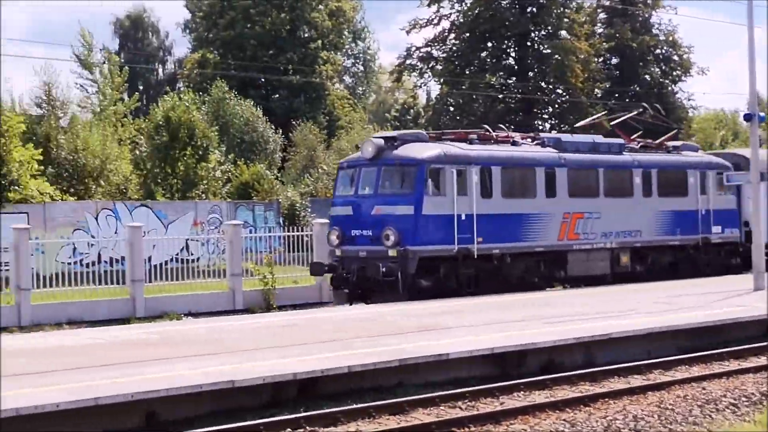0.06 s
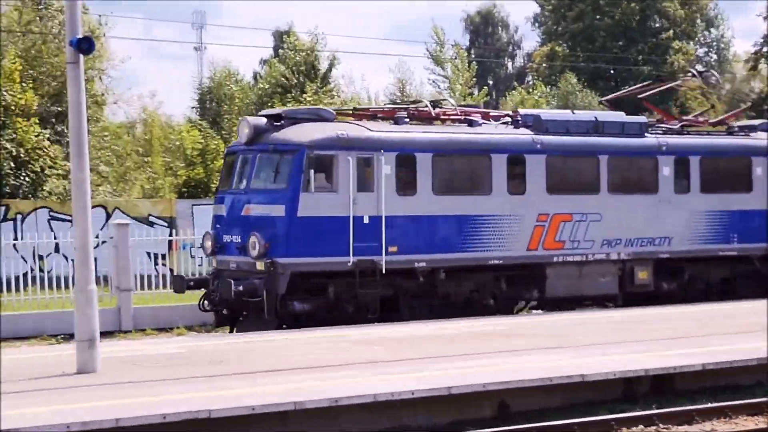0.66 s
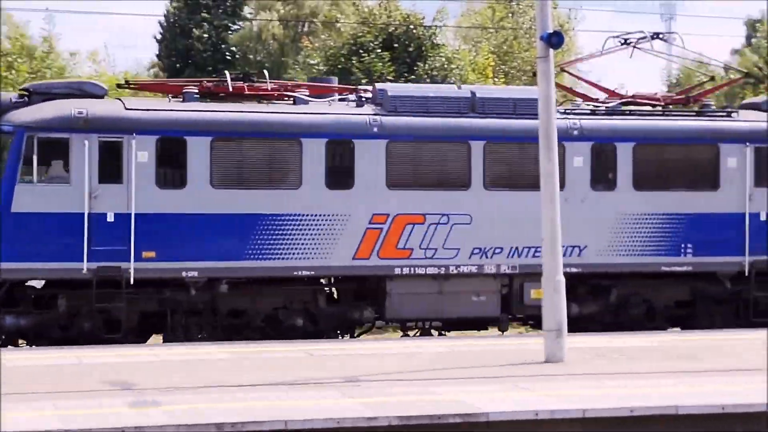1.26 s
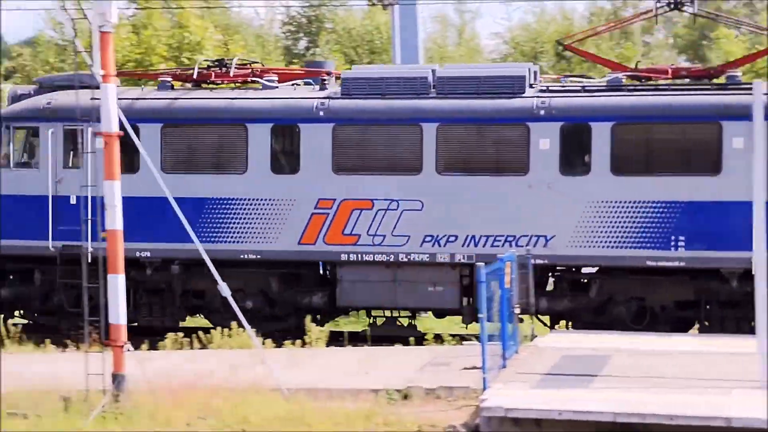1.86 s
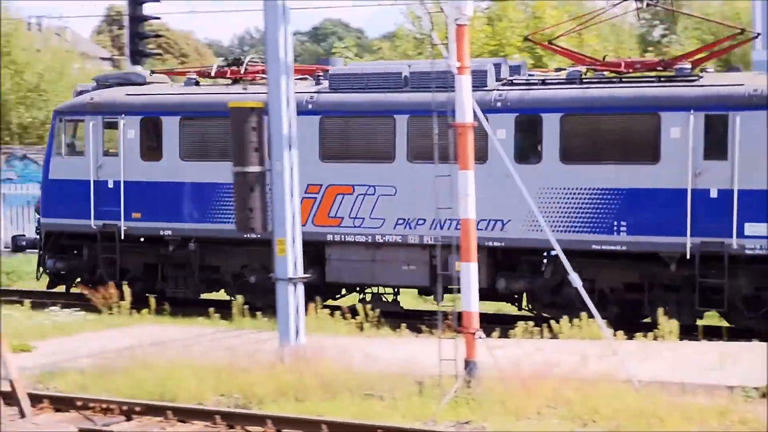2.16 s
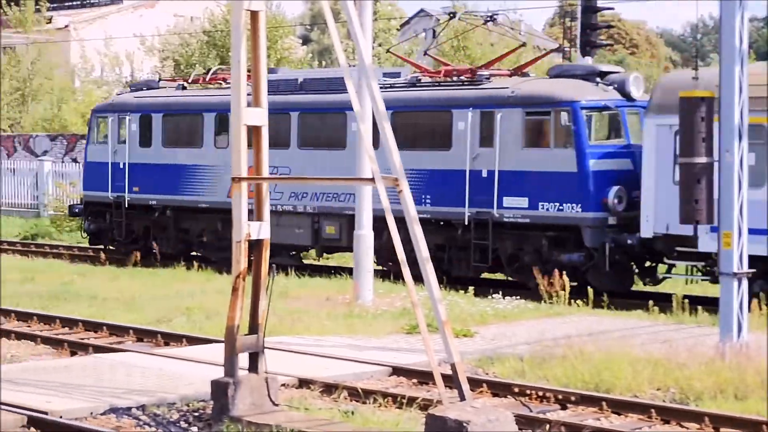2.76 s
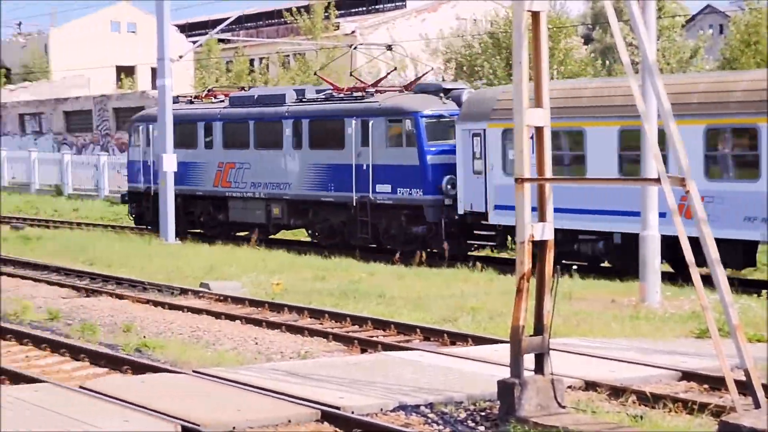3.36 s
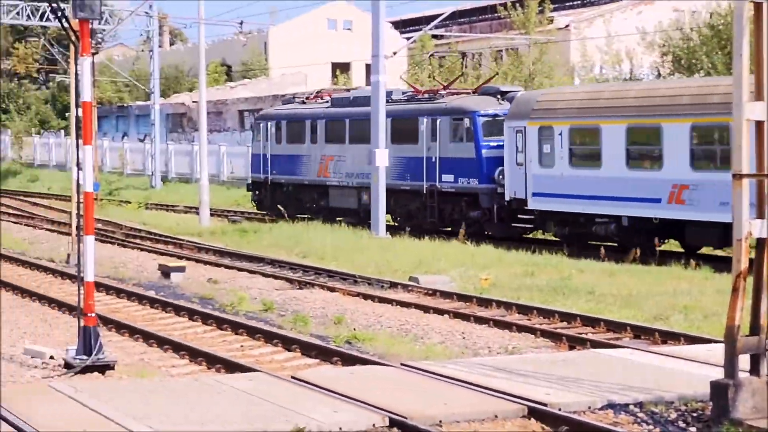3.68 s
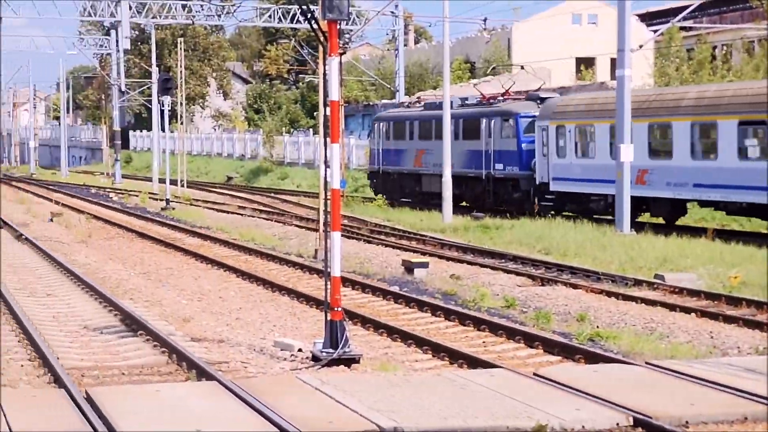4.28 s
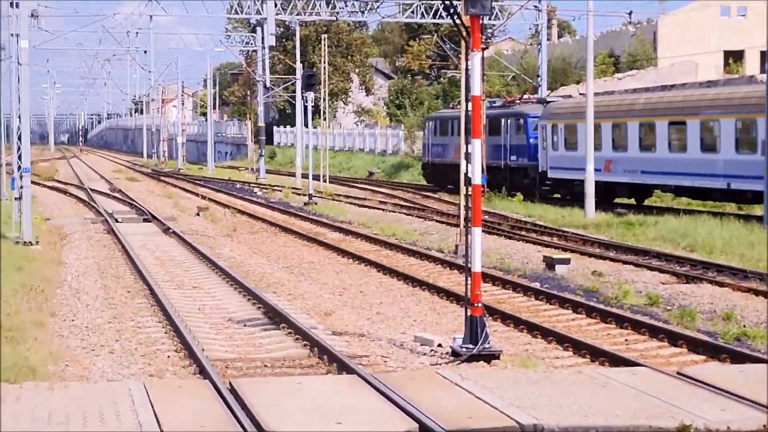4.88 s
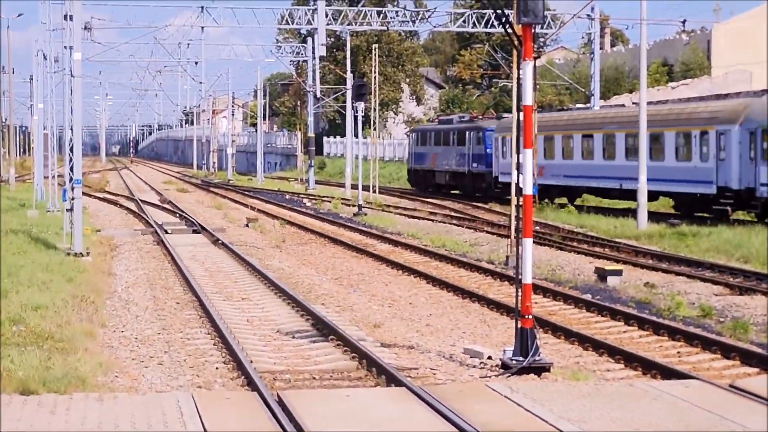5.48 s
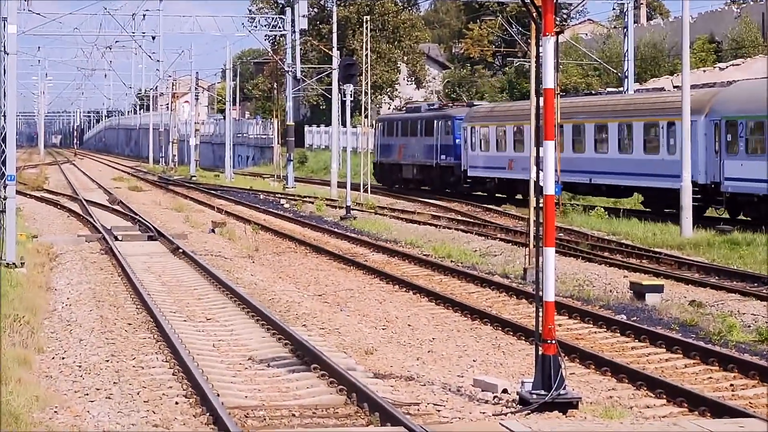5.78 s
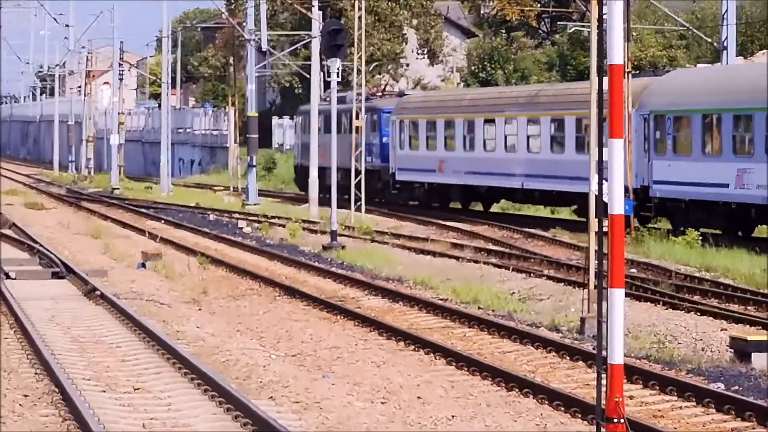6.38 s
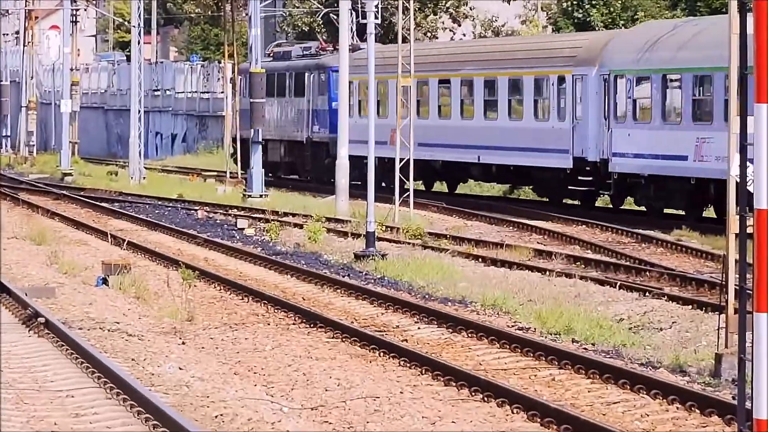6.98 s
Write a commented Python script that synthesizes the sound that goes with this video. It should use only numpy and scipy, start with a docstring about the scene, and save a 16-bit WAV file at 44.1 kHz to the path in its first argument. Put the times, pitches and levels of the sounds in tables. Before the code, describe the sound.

An electric train passes close to a station platform, heard in stereo with faint, low gusts on the microphone. From the start the rails carry a roar ahead of it, and single wheels sing out in brief metallic tones that recur throughout. At about 0.8 seconds comes a short, high hiss, with soft thumps there and near 1.3 seconds. The locomotive's bright, rough rush of steel wheels peaks around 1.6 seconds over a low rumble. The coaches follow from roughly 2.5 seconds with a duller rush, more ringing and a strong rail roar, swelling near 3, 3.8 and 5 seconds. The wheel noise sinks in pitch as they go by. Wheels knock and clank near 1.8 and 2.5 seconds, several times between 3.5 and 4.1, and again around 6 and 6.5. A faint low drone accompanies the last coaches, and the rolling eases, still audible at 7 seconds.

```python
"""An electric train runs through a station, heard in stereo from the platform, close to the track.
Light air brushes the microphone, single wheels sing out, and the rails carry a roar ahead of the train.
The locomotive spits a short hiss and passes in a bright rush of rough steel rolling on steel.
Its coaches follow over roaring rails: a few wheels knock, the bodies rumble, and the wheels' ringing
sinks in pitch as they go by. A low drone hangs about the last coaches."""
import sys
import numpy as np
from scipy import signal
from scipy.fft import rfft, irfft, next_fast_len
from scipy.io import wavfile
from scipy.ndimage import uniform_filter1d, map_coordinates

SR = 44100
rng = np.random.default_rng(int(sys.argv[2]) if len(sys.argv) > 2 else 0)


def waveform_to_disk(signal):
    """Save audio, clipped to [-1, 1], as 16-bit WAV at the path in sys.argv[1]."""
    frames = np.transpose(np.atleast_2d(signal))
    scaled = np.clip(frames, -1, 1) * 32767
    samples = np.round(scaled).astype(np.int16)
    wavfile.write(sys.argv[1], SR, samples)


N = 314874
TIME = np.arange(N) / SR
FREQ = np.maximum(np.fft.rfftfreq(next_fast_len(int(1.1 * N)), 1 / SR), 1)

# A coach wheel's resonances at rest. Each row: pitch in Hz, width in Hz, relative level in dB.
COACH_MODES = [(1495, 130, 0), (2085, 100, 0.3), (2672, 75, -0.3), (2825, 115, 2), (3080, 100, -1.5),
               (3445, 80, -1), (3740, 90, -1), (4220, 90, -4.5), (4820, 220, -6.5), (5720, 260, -14)]
# The spectrum of the rails. Each row: frequency in Hz, relative level in dB.
RAIL_SPECTRUM = [(250, -59), (340, -20), (400, -4.5), (480, 0), (700, 1), (900, 3), (1100, 2.5),
                 (1270, -3.5), (1420, 1.5), (1700, -4.5), (2300, -8), (4500, -25)]


def undb(db):
    """Decibels to gain."""
    return 10 ** (np.asarray(db) / 20)


def colour(points):
    """Gain per frequency through (Hz, dB) points, silent above the last."""
    hz, db = np.transpose(points)
    return undb(np.interp(np.log(FREQ), np.log(hz), db, right=-np.inf))


def resonance(hz, width_hz):
    """Gain per frequency of one steep-sided resonance."""
    detune = (FREQ - hz ** 2 / FREQ) / (1.55 * width_hz)
    return 1 / (1 + detune ** 2)


def wheel_response(modes):
    """Gain per frequency of a wheel's resonances together."""
    return np.sqrt(sum((undb(db) * resonance(hz, width)) ** 2 for hz, width, db in modes))


def noise(gain):
    """Two unrelated noises (for mid and side) of one colour, rms 1, a little longer than the scene."""
    shape = (2, len(FREQ))
    x = irfft(gain * (rng.standard_normal(shape) + 1j * rng.standard_normal(shape)))
    return x / x.std()


def walk(rate, size=N):
    """Random levels held 1 / rate seconds and smoothed twice; spread near 1."""
    hold = max(int(SR / rate), 1)
    held = rng.standard_normal(1024)[np.arange(size) // hold % 1024]
    return 1.3 * uniform_filter1d(uniform_filter1d(held, hold), hold)


def passing(nearest_s, db, near_s):
    """Gain of sources that swell and fade with distance from the microphone; their powers add."""
    falloff_db = 30.5  # per tenfold distance: wheels radiate mostly sideways
    distance = np.hypot(1, (TIME - np.atleast_1d(nearest_s)[:, None]) / near_s)
    level_db = np.atleast_1d(db)[:, None] - falloff_db * np.log10(distance)
    return np.linalg.norm(undb(level_db), axis=0)


def doppler_glide(mach=.104, steepest_s=2.23, half_s=2.34):
    """Pitch ratio at the platform: high on the approach, low on the way out."""
    along = TIME - steepest_s
    return 1 / (1 + mach * along / np.hypot(along, half_s))


def moving(x, doppler):
    """Play a sound faster while it approaches and slower as it leaves."""
    place = np.cumsum(doppler)
    return np.array([map_coordinates(row, [place], order=3, mode="wrap") for row in x])


def puff(s, half_s, hz, width_hz, db):
    """A short smooth swell of noise in one band."""
    return noise(resonance(hz, width_hz))[:, :N] * undb(db) * np.exp(-((TIME - s) / half_s) ** 2)


def breeze(start_db=-60, fade_db_per_s=.6, gust_db=2.8):
    """Light air brushes the microphone in low gusts that slowly fade."""
    # Each row: frequency in Hz, relative level in dB.
    spectrum = [(15, -3), (28, -5), (45, 0.5), (68, 4), (100, -14), (200, -15), (600, -39)]
    return noise(colour(spectrum))[:, :N] * undb(start_db - fade_db_per_s * TIME + gust_db * walk(13))


def mode_swells(doppler, swells):
    """A wheel mode, shaken at random, swells and glides down with the pass, once for each row."""
    out = np.zeros(N)
    for s, half_s, hz, width_hz, db in swells:
        near = np.abs(TIME - s) < 3 * half_s
        t = TIME[near]
        phase = 2 * np.pi * np.cumsum(hz * doppler[near] / doppler[int(s * SR)]) / SR
        # the mode forgets its size and phase at a rate set by its width
        ring = walk(2 * width_hz, len(t)) * np.cos(phase) + walk(2 * width_hz, len(t)) * np.sin(phase)
        out[near] += ring * undb(db) * np.exp(-((t - s) / half_s) ** 2) / np.sqrt(2)
    return out


def singing_wheels(doppler):
    """Single wheels sing out above the rush, alike in both channels."""
    # Each row: middle and half length in seconds, pitch at the platform and width in Hz, level in dB.
    swells = [ (.26, .09, 4340, 28, -30.5), (.28, .04, 3100, 400, -27.5), (.2, .25, 2990, 70, -33),
              (.75, .16, 2800, 330, -29.5), (1.21, .17, 620, 60, -28.5), (1.55, .09, 2900, 220, -26),
              (2.21, .07, 602, 40, -28), (2.55, .13, 950, 200, -30), (2.7, .35, 2780, 70, -29.5),
              (2.9, .15, 1445, 45, -25.5), (3.0, .3, 2035, 55, -28.5), (3.47, .1, 2580, 55, -27),
              (3.62, .06, 2435, 40, -29), (3.75, .3, 1395, 45, -27), (3.85, .25, 4590, 120, -36.5),
              (4.4, .13, 2455, 60, -30), (4.52, .08, 1841, 40, -31), (4.83, .06, 2435, 40, -31),
              (5.2, .13, 1365, 90, -29), (5.95, .2, 2950, 420, -30), (6.22, .12, 4570, 100, -39),
              (6.15, .65, 2630, 190, -31.5), (6.44, .09, 2620, 130, -28), (6.5, .13, 1915, 55, -33.5),
              (6.85, .08, 2971, 25, -35), (7.0, .2, 2565, 85, -28.5)]
    return mode_swells(doppler, swells)


def roar_ahead():
    """The rails carry a roar to the platform ahead of the locomotive."""
    # Each row: frequency in Hz, relative level in dB.
    spectrum = [(290, -31.5), (390, -1), (480, -2), (700, -6), (1100, -1.5), (1290, -9), (2100, -9),
                (2550, 1), (3100, -12), (4500, -30)]
    return noise(colour(spectrum))[:, :N] * passing(nearest_s=1, db=-28, near_s=.8)


def spit():
    """A short, high hiss comes from the approaching locomotive."""
    return puff(s=.825, half_s=.068, hz=9900, width_hz=2900, db=-46.5)


def thumps():
    """Soft thumps and surges rise out of the rolling."""
    # Each row: middle and half length in seconds, band centre and width in Hz, level in dB.
    surges = [ (.835, .016, 230, 110, -38), (1.265, .016, 230, 110, -39), (3.87, .09, 740, 300, -29),
              (5.342, .02, 112, 65, -45), (5.39, .03, 780, 300, -30), (5.995, .022, 215, 110, -43.5),
              (6.22, .025, 720, 200, -31), (6.6, .4, 520, 160, -39)]
    return sum(puff(*surge) for surge in surges)


def rolling(gain, doppler, patchy_db=.5, patches_per_s=35):
    """Surface roughness shakes the moving wheels; rough patches come and go."""
    return moving(noise(gain), doppler) * undb(patchy_db * walk(patches_per_s))


def locomotive(doppler, nearest_s, rush_db, ring_db, near_s=1.18):
    """The locomotive's wheels roll by: a bright rush with a few resonances in it."""
    # The rush at rest. Each row: frequency in Hz, relative level in dB.
    spectrum = [(300, -39), (1200, -12), (1600, -2), (2200, 0), (2700, 1), (3350, 0), (4100, 0), (4500, -8),
                (5100, -12.5), (6200, -18.5), (7500, -25.5), (9500, -35), (12000, -48), (14000, -55.5)]
    # The wheel's resonances at rest. Each row: pitch in Hz, width in Hz, relative level in dB.
    modes = [(525, 103, -5.5), (1477, 71, -0.5), (2810, 76, 5), (3000, 60, -10), (4150, 160, -3.5)]
    rush = rolling(colour(spectrum), doppler) * passing(nearest_s, rush_db, near_s)
    ring = rolling(wheel_response(modes), doppler, patchy_db=-.7)
    return rush + ring * passing(nearest_s, ring_db, near_s)


def throb(turn_hz=6.9):
    """Swing of out-of-round wheels, which press on the track once a turn."""
    turns = np.cumsum(turn_hz * (1 + .089 * walk(2.4))) / SR
    return np.sin(2 * np.pi * turns)


def bodies(nearest_s, db, throb_db=1.1, patchy_db=1.5):
    """The bodies rumble in uneven surges, shaken by their wheels."""
    # Each row: frequency in Hz, relative level in dB.
    spectrum = [(60, -15.5), (95, -9.5), (125, -14), (160, 0.5), (210, 0.5), (268, 5.5), (320, 1),
                (400, 3.5), (700, -24.5)]
    rumble = noise(colour(spectrum))[:, :N] * undb(throb_db * throb() + patchy_db * walk(29))
    return rumble * passing(nearest_s, db, near_s=1.17)


def rails(nearest_s, db, throb_db=.4, patchy_db=.4):
    """The rails stay put, so their roar keeps its pitch; it throbs with the wheels and carries far."""
    roar = noise(colour(RAIL_SPECTRUM))[:, :N] * undb(throb_db * throb() + patchy_db * walk(25.28))
    return roar * passing(nearest_s, db, near_s=1.354)


def knocks(doppler, attack_s=.002, decay_s=.02):
    """A wheel strikes a flaw in the track: it clanks, the rail knocks, and both die away at once."""
    # Each row: start in seconds, wheel clank in dB, rail knock in dB.
    strikes = [(1.828, -28, -22), (2.422, -18, -28), (2.618, -26, -17), (3.566, -18, -19),
               (3.825, -27, -22), (3.91, -30, -22), (4.07, -30, -19), (5.908, -22, -27), (5.985, -28, -24),
               (6.458, -21, -31)]
    clank = moving(noise(wheel_response(COACH_MODES)), doppler)
    knock = noise(colour(RAIL_SPECTRUM))[:, :N]
    out = np.zeros((2, N))
    for s, clank_db, knock_db in strikes:
        age = np.maximum(TIME - s, 0)
        blow = np.minimum(age / attack_s, 1) * np.exp(-age / decay_s)
        out += blow * (undb(clank_db) * clank + undb(knock_db) * knock)
    return out


def coach_ringing(doppler, waver_share=.006, wavers_per_s=7):
    """Each resonance of the coach wheels swells and wavers in pitch on its own."""
    sizes = np.array([undb(db) * np.sqrt(width) for _, width, db in COACH_MODES])
    out = np.zeros((2, N))
    for (hz, width, _), size in zip(COACH_MODES, sizes / np.linalg.norm(sizes)):
        wavering = doppler * (1 + waver_share * walk(wavers_per_s))
        out += size * rolling(resonance(hz, width), wavering, patchy_db=2.05)
    return out


def flares(doppler, per_s=16, half_s=.055, width_hz=25, relative_db=-9):
    """At random, one resonance of one coach wheel flares up; no two wheels are tuned quite alike."""
    swells = []
    for when, which, detune in rng.random((int(per_s * N / SR), 3)):
        hz, _, db = COACH_MODES[int(which * len(COACH_MODES))]
        heard_hz = hz * doppler[int(when * N)] * (1 + .06 * (detune - .5))
        swells.append((when * N / SR, half_s, heard_hz, width_hz, relative_db + db))
    return mode_swells(doppler, swells)


def coaches(doppler, nearest_s, rush_db, ring_db, near_s=1):
    """The coaches' wheels roll by: a duller rush and more ringing."""
    # The rush at rest. Each row: frequency in Hz, relative level in dB.
    spectrum = [(300, -34.5), (1200, -26), (1700, -3), (2400, -3), (3000, -1), (3900, -2.5), (4350, -2.5),
                (4650, -6.5), (5500, -11.5), (6600, -21), (8300, -30), (10500, -41.5), (12000, -55.5),
                (14500, -67)]
    rush = rolling(colour(spectrum), doppler) * passing(nearest_s, rush_db, near_s)
    ring = coach_ringing(doppler)
    ring[0] += flares(doppler)  # in the mid only
    return rush + ring * passing(nearest_s, ring_db, near_s)


def drone(patchy_db=2):
    """A low, uneven drone hangs about the last coaches."""
    # Each row: frequency in Hz, relative level in dB.
    spectrum = [(60, -18), (90, 2), (115, -3.5), (150, 0.5), (260, -3.5), (420, -24)]
    hum = noise(colour(spectrum))[:, :N] * undb(patchy_db * walk(9))
    return hum * passing(nearest_s=5.7, db=-57.5, near_s=1.4)


def spread(sound, change_s=(4.1, 2.5)):
    """The channels part slightly; the top treble is wider in the later part."""
    # Stereo width. Each row: frequency in Hz, side against mid in dB early on, then later.
    width = [(60, -15, -15), (120, -15, -13), (200, -19.5, -18), (460, -25.5, -29.5), (1200, -25, -25),
             (2200, -22, -21.5), (4000, -19, -18.5), (5200, -18, -17), (7300, -12.5, -4), (13000, -15, -2)]
    hz, early_db, late_db = np.transpose(width)
    mid, raw_side = sound
    spectrum = rfft(raw_side, 2 * (len(FREQ) - 1))
    early, late = (irfft(spectrum * colour(np.c_[hz, db]))[:N] for db in (early_db, late_db))
    side = early + (late - early) * np.interp(TIME, change_s, [0, 1])
    return np.array([mid + side, mid - side])


def scene():
    """At the microphone, the locomotive's wheels give way to the coaches' over the roar of the rails."""
    # Wheel groups going by, the locomotive's first. Each row: moment when nearest in seconds,
    # then rail roar, wheel rush, wheel ringing and body rumble in dB.
    bogies = [(1.62, -33, -18, -27.5, -42.5), (2.95, -22.5, -22, -42, -43.5), (3.77, -25, -32.5, -23, -58),
              (5.04, -26.5, -25, -27, -50), (6.17, -41, -25.5, -31.5, -57)]
    nearest_s, rail_db, rush_db, ring_db, body_db = np.transpose(bogies)
    doppler = doppler_glide()
    mix = breeze() + roar_ahead() + spit() + thumps()
    mix += locomotive(doppler, nearest_s[0], rush_db[0], ring_db[0])
    mix += bodies(nearest_s, body_db) + rails(nearest_s, rail_db) + knocks(doppler)
    mix += coaches(doppler, nearest_s[1:], rush_db[1:], ring_db[1:]) + drone()
    return spread(mix) + singing_wheels(doppler)


def record(dry):
    """The recorder cuts the top treble steeply."""
    top_hz = 13900
    return signal.sosfilt(signal.ellip(8, .2, 70, top_hz, fs=SR, output="sos"), dry)


dry = scene()
out = record(dry)
waveform_to_disk(out)
```